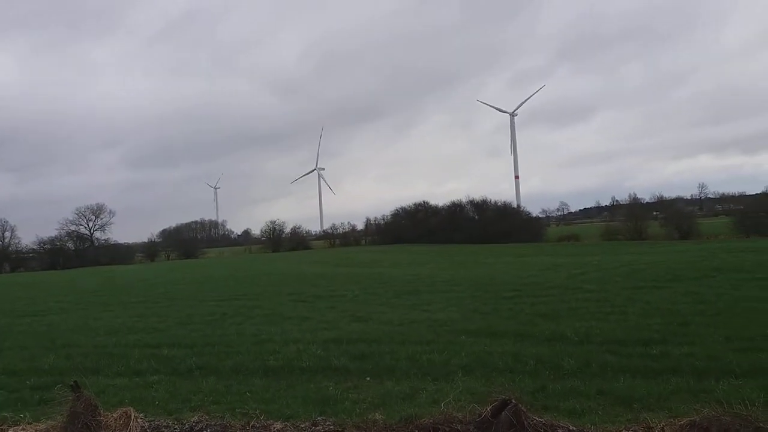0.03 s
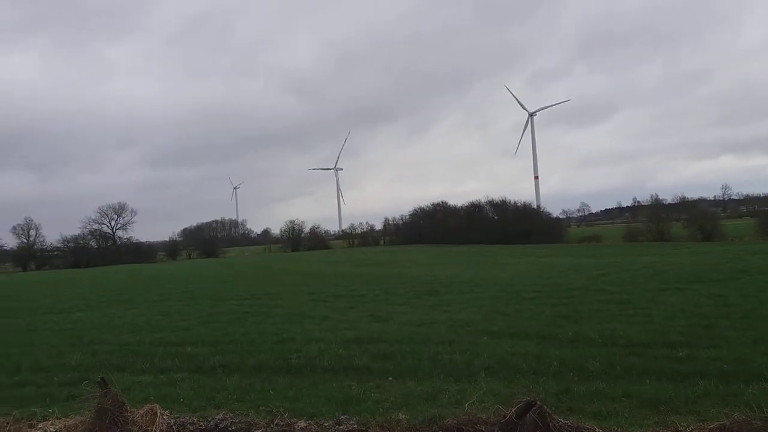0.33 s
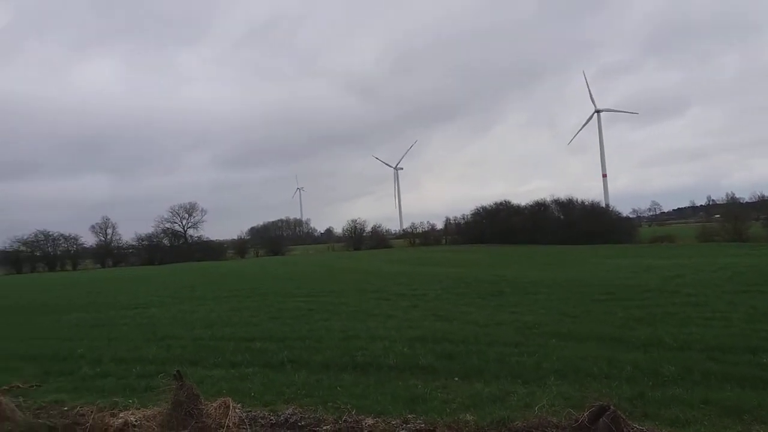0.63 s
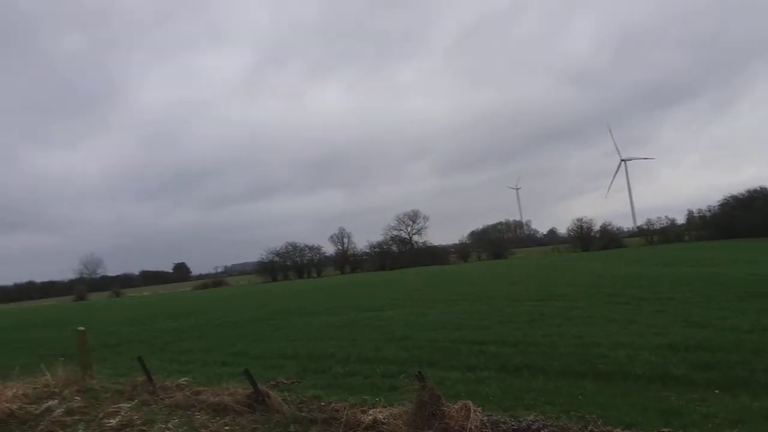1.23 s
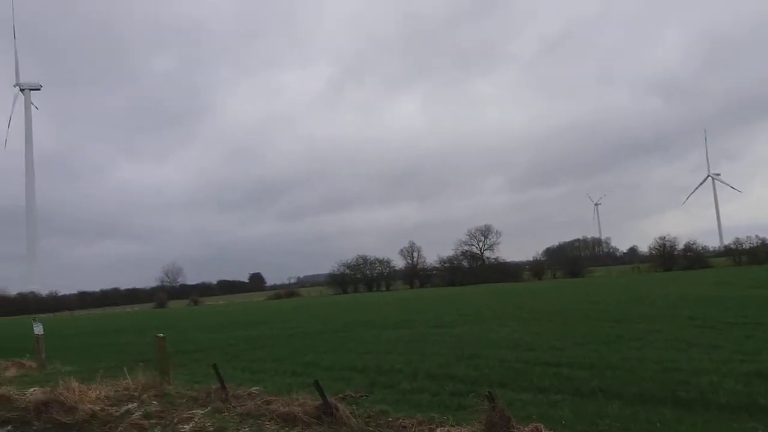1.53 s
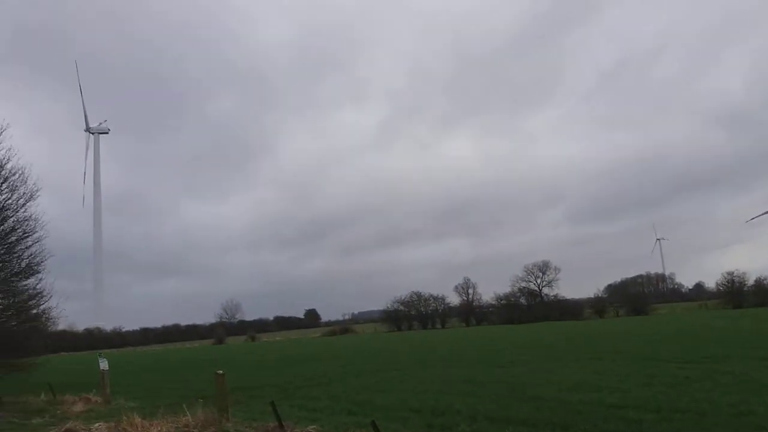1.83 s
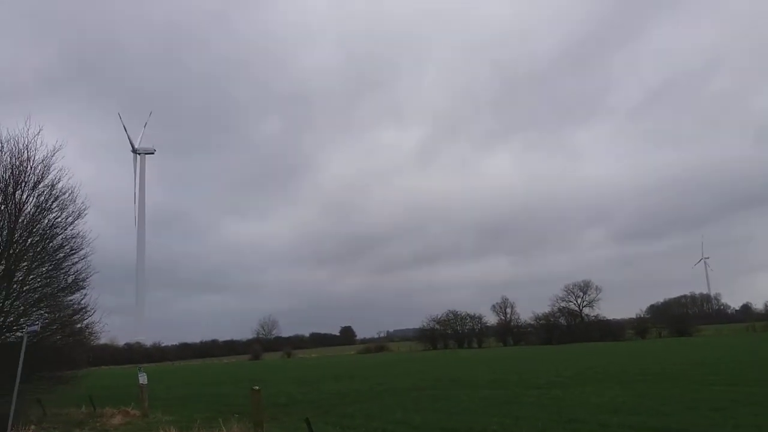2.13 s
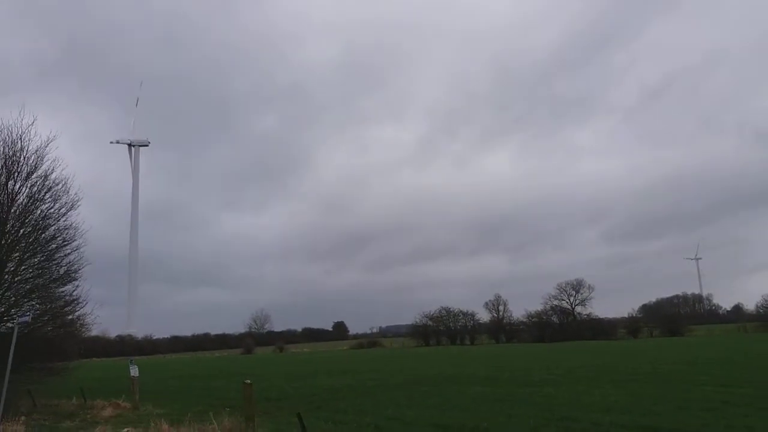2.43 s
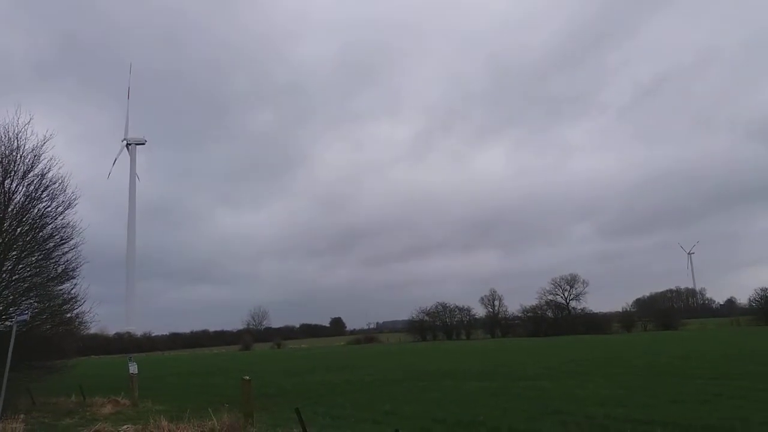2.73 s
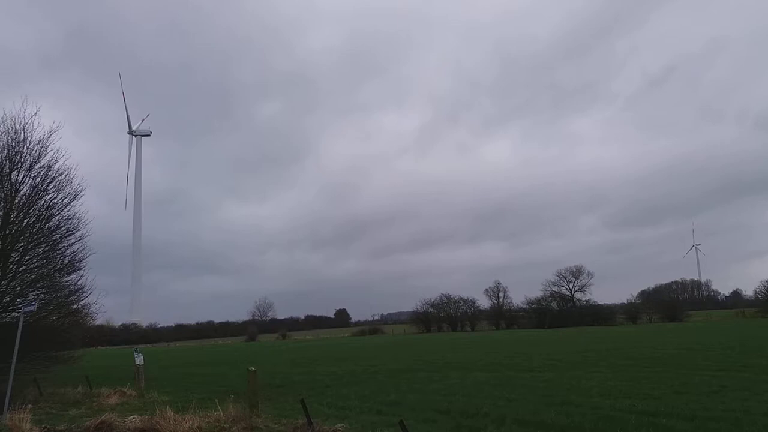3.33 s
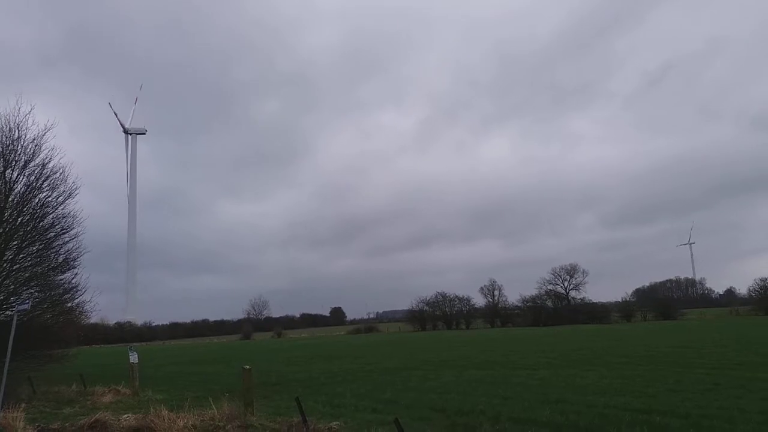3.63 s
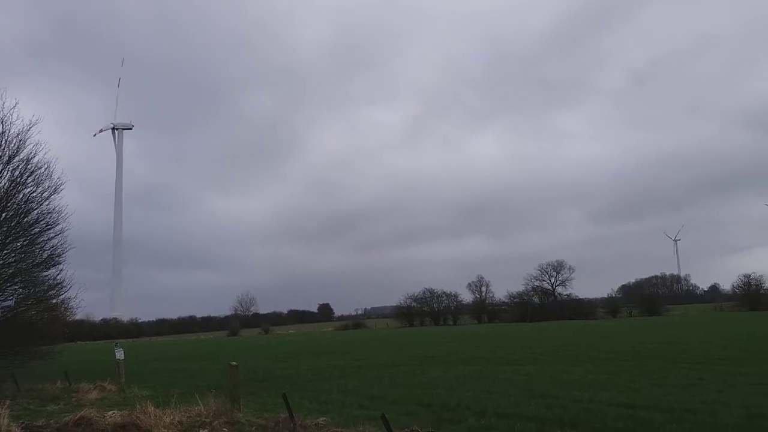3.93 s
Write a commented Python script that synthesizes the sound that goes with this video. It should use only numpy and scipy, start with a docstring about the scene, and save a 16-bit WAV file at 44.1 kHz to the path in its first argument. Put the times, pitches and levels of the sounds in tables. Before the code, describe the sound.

Distant road traffic rushes steadily, with wind buffeting the microphone over an open field.

```python
"""Tyres roar steadily on a distant road, swelling and changing colour as the air carries them
over an open field. Wind rustles dry grass and bare twigs; gusts add swishes and thin sizzles.
Turbulence buffets the microphone, and now and then an eddy hits it with a soft thump.
A few tiny ticks sound close by, over a faint even hiss."""
import sys
import numpy as np
from scipy.fft import rfft, irfft, next_fast_len
from scipy.io import wavfile
from scipy.ndimage import map_coordinates

SR = 44100
rng = np.random.default_rng(int(sys.argv[2]) if len(sys.argv) > 2 else 0)


def materialize(psi):
    """Save the field psi as 16-bit PCM at rate SR to the path in sys.argv[1].

    A 1-D psi becomes a single channel; in a 2-D psi each row is a channel.
    """
    bounded = np.clip(np.atleast_2d(psi).T, -1, 1)
    quanta = np.round(bounded * 32767).astype(np.int16)
    wavfile.write(sys.argv[1], SR, quanta)


N = 176400


def amp(db):
    """Decibels to gain."""
    return 10 ** (np.asarray(db) / 20)


def unit(x):
    """Scaled to rms 1."""
    return x / np.sqrt(np.mean(x ** 2) + 1e-20)


def colour(points, hz):
    """Gain of (Hz, dB) points on a log axis."""
    f, db = np.transpose(points)
    return amp(np.interp(np.log(hz + 1), np.log(f + 1), db))


def curves(rows):
    """One value per sample for each column after the time."""
    s, *cols = np.transpose(rows)
    return [np.interp(np.arange(N) / SR, s, c) for c in cols]


def wobble(rate):
    """A smooth random curve, rate knots a second."""
    return map_coordinates(rng.standard_normal(N // 100), [np.arange(N) * rate / SR], mode="wrap")


def filtered(x, response):
    """x times a response of frequency."""
    m = next_fast_len(N + SR // 2)
    return irfft(rfft(x, m) * response(np.fft.rfftfreq(m, 1 / SR)), m)[:N]


def above(hz, edge_hz, order=6):
    """Gain of a high-pass slope."""
    return 1 / np.sqrt(1 + (edge_hz / (hz + 1)) ** (2 * order))


def swell(s, half_s):
    """A smooth rise and fall around time s."""
    return np.exp(-((np.arange(N) / SR - s) / half_s) ** 2)


def hump(hz, centre_hz, octaves):
    """Gain of a broad resonance."""
    return np.exp(-(np.log2((hz + 1) / centre_hz) / octaves) ** 2 / 2)


def smooth_noise(response):
    """Even coloured noise of rms 1."""
    return unit(filtered(rng.standard_normal(N), response))


# Tyre roar per band: time_s, low_db, mid_db, high_db
ROAD_LEVELS = [(0.0, -41.5, -34.5, -41.5), (0.4, -40, -34.5, -41.5), (0.6, -42, -34, -36.5),
               (0.75, -37.0, -35.5, -37), (0.93, -38.5, -33.5, -39.5), (1.08, -33.5, -32.0, -36.5),
               (1.3, -31, -34.5, -37), (1.45, -33, -34, -39), (1.75, -32.5, -32.5, -40.5),
               (1.9, -34.5, -29, -36), (2.13, -33.5, -33.5, -41), (2.32, -32.5, -30.5, -35.5),
               (2.6, -37.5, -36.5, -37.5), (3.1, -41, -38, -40.5), (3.42, -38.0, -34, -41.5),
               (3.6, -40.5, -36.0, -40.5), (3.85, -40.5, -34.0, -35), (4.0, -39.5, -36.5, -33.5)]
# Low, mid and high band: low_hz, high_hz, gain_db
ROAD_BANDS = [(694, 1170, 0), (1110, 2080, -0.28), (1985, 3015, 0)]
# Distant tyres: freq_hz, density_db
TYRE_SPECTRUM = [(500, -6), (660, -11), (750, -4), (900, -3), (1100, 0), (1550, 6), (2050, -0.5),
                 (2600, -11), (3400, -14.5), (5000, -22)]
# Engines and dull body of the traffic: freq_hz, density_db
DRONE_SPECTRUM = [(30, -35), (55, 3), (85, -2.5), (125, 0.5), (165, 0.5), (215, -0.5), (300, -3.5),
                  (390, -7), (500, -6.5), (640, -3.5), (900, -21), (1500, -45)]

def traffic(drone_db=-44):
    """Tyre roar whose bands fade and swell on their way through the air, over a low engine drone."""
    out = amp(drone_db) * smooth_noise(lambda hz: colour(DRONE_SPECTRUM, hz))
    for level_db, (low_hz, high_hz, gain_db) in zip(curves(ROAD_LEVELS), ROAD_BANDS):
        def tyre_band(hz):
            high_pass = above(hz, low_hz, order=8)
            low_pass = np.sqrt(1 - above(hz, high_hz, order=8) ** 2)
            return colour(TYRE_SPECTRUM, hz) * high_pass * low_pass
        out += amp(level_db + gain_db) * smooth_noise(tyre_band)
    return out


# Rustle envelope: time_s, level_db
GRASS_LEVEL = [(0, -55.5), (.7, -54.5), (1.55, -54.5), (2.5, -48.5), (3.2, -53), (4, -55)]
# Dry grass: freq_hz, density_db
GRASS_SPECTRUM = [(1500, -25), (2600, -3.5), (3400, 3), (4100, -0.5), (5000, -7), (6200, -11.5),
                  (7200, -15.5), (8200, -32), (12000, -35), (16000, -50)]

def grass_rustle():
    """Dry stalks rustle steadily in the wind."""
    return amp(curves(GRASS_LEVEL)[0]) * smooth_noise(lambda hz: colour(GRASS_SPECTRUM, hz))


# Wind on the microphone: time_s, level_db
BUFFET_LEVEL = [(0, -48), (.35, -57), (.7, -48), (1.0, -45), (1.3, -37.5), (1.6, -41.5), (1.95, -37.5),
                (2.15, -39.5), (2.75, -44.5), (3.05, -41), (3.35, -41.5), (3.58, -46.5), (3.72, -46),
                (4, -47)]
# Single puffs: peak_s, half_s, level_db
PUFFS = [(0.145, 0.065, -34), (0.73, 0.074, -37.5), (.91, 0.026, -38.5), (1.092, 0.048, -31.5),
         (1.44, 0.018, -28.5), (1.732, 0.033, -29), (1.872, 0.084, -27), (2.26, 0.052, -31.5),
         (2.433, 0.067, -38.5), (2.592, .025, -34), (2.783, .04, -36), (3.17, 0.026, -34)]
# Wind rumble: freq_hz, density_db
BUFFET_SPECTRUM = [(20, -42), (35, -16), (55, -10.5), (75, 4), (100, 2), (135, 0.5), (170, -1.5),
                   (210, -10.5), (270, -13.5), (400, -25), (700, -45), (2000, -66)]

def buffet(flutter_db=1.43, flutter_per_s=30.07):
    """Turbulence at the microphone makes a lumpy rumble; single puffs add to its power."""
    wind_power = amp(curves(BUFFET_LEVEL)[0]) ** 2
    puff_power = sum((amp(level_db) * swell(peak_s, half_s)) ** 2 for peak_s, half_s, level_db in PUFFS)
    flutter = amp(flutter_db * wobble(flutter_per_s))
    rumble = smooth_noise(lambda hz: colour(BUFFET_SPECTRUM, hz))
    return np.sqrt(wind_power + puff_power) * flutter * rumble


# Upper hiss envelope: time_s, level_db
HISS_LEVEL = [(0, -83), (.9, -70.5), (1.5, -65), (2.0, -61), (3.2, -60.5), (4, -58.5)]
# Upper hiss: freq_hz, density_db
HISS_SPECTRUM = [(3000, -8), (5000, -6), (6500, 0.5), (7200, 0), (8000, -13), (9500, -13), (14000, -31)]
# Microphone self-noise: freq_hz, density_db
FLOOR_SPECTRUM = [(100, 2), (8000, -4), (12000, -2.5), (16000, -1.5)]

def hiss(floor_db=-69):
    """A soft upper hiss slowly grows over the microphone's own even noise."""
    upper = amp(curves(HISS_LEVEL)[0]) * smooth_noise(lambda hz: colour(HISS_SPECTRUM, hz))
    return upper + amp(floor_db) * smooth_noise(lambda hz: colour(FLOOR_SPECTRUM, hz))


# Eddies hitting the microphone: time_s, level_db, width_s, wake_relative_db
EDDIES = [(0.141, -29, 0.003, -8), (1.4839, -13.5, 0.0012, -23), (1.843, -20, 0.001, -22),
          (1.891, -17.5, 0.0011, -28), (2.6882, -13, 0.0011, -7), (3.309, -22, 0.0021, -20)]

def thumps(cut_hz=119, cut_q=1.56, wake_hz=63, wake_t60_s=0.1):
    """Each eddy's pressure bump briefly rings the microphone's bass cut and trails a deep wake."""
    t, out = np.arange(N) / SR, np.zeros(N)
    bass_cut = lambda hz: hz ** 2 / (hz ** 2 - cut_hz ** 2 - 1j * hz * cut_hz / cut_q)
    for time_s, level_db, width_s, wake_relative_db in EDDIES:
        pressure = (1 + ((t - time_s) / width_s) ** 2 / 2) ** -2
        swing = filtered(pressure, bass_cut)
        age_s = np.maximum(t - time_s, 0)
        wake = amp(wake_relative_db - 60 * age_s / wake_t60_s) * np.sin(2 * np.pi * wake_hz * age_s)
        out += amp(level_db) * (swing / np.abs(swing).max() + wake)
    return out


# Tiny ticks close by: start_s, level_db
TICKS = [(.4755, -45), (.598, -48), (.951, -48), (1.064, -39), (3.0902, -47), (3.4233, -34)]

def ticks(low_cut_hz=4000):
    """Dry, bright snaps: high-passed impulses with no ring."""
    impulses = np.zeros(N)
    for start_s, level_db in TICKS:
        impulses[round(start_s * SR)] += amp(level_db)
    return filtered(impulses, lambda hz: above(hz, low_cut_hz, order=2))


# Gusts in the stalks: peak_s, half_s, swish_db, centre_hz, sizzle_db
GUSTS = [(0.946, 0.16, -52, 3600, -78), (1.124, 0.14, -54, 4280, -74), (1.28, 0.12, -50.5, 3060, -82),
         (1.883, 0.13, -50.5, 3620, -78), (2.333, 0.12, -51, 3950, -66.5), (2.484, 0.15, -49, 3900, -70),
         (2.783, 0.15, -53.5, 3830, -76), (3.964, 0.079, -56, 2900, -85)]
# Sizzle riding on a gust: freq_hz, density_db
SIZZLE_SPECTRUM = [(7000, -30), (8400, -9), (9200, 1), (10300, -4), (11300, -7), (12300, -7), (13500, -16),
                   (15500, -20)]

def gust_swishes(width_octaves=0.36):
    """Each gust swishes through the stalks at its own pitch, with a sizzle on top."""
    out = np.zeros(N)
    sizzle = smooth_noise(lambda hz: colour(SIZZLE_SPECTRUM, hz))
    for peak_s, half_s, swish_db, centre_hz, sizzle_db in GUSTS:
        swish = smooth_noise(lambda hz: hump(hz, centre_hz, width_octaves))
        out += swell(peak_s, half_s) * (amp(swish_db) * swish + amp(sizzle_db) * sizzle)
    return out


# Lone sizzles in the grass: peak_s, half_s, level_db, centre_hz
THIN_SIZZLES = [(2.9, .11, -70, 8300), (3.7, .15, -69, 9650)]

def thin_sizzles(width_octaves=0.11):
    """Narrow, high bands of grass noise rise and fall."""
    out = np.zeros(N)
    for peak_s, half_s, level_db, centre_hz in THIN_SIZZLES:
        sizzle = smooth_noise(lambda hz: hump(hz, centre_hz, width_octaves))
        out += swell(peak_s, half_s) * amp(level_db) * sizzle
    return out


def scene():
    """Road, grass and wind at one microphone."""
    field = traffic() + grass_rustle() + gust_swishes() + thin_sizzles()
    return (field + hiss() + buffet() + thumps() + ticks())[None]


LOW_CUT_HZ, TOP_HZ = 39, 15720

def record(dry):
    """The recorder drops the deepest bass and everything above its band limit."""
    return filtered(dry[0], lambda hz: above(hz, LOW_CUT_HZ, order=4) * (hz < TOP_HZ))[None]


dry = scene()
out = record(dry)
materialize(out)
```